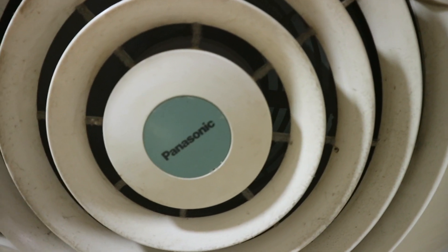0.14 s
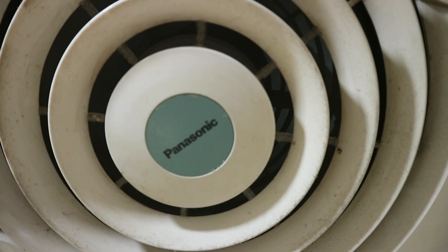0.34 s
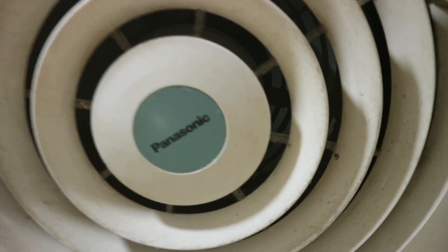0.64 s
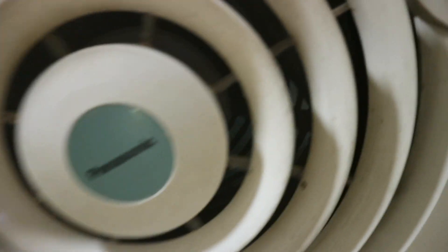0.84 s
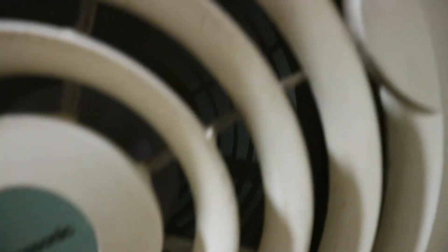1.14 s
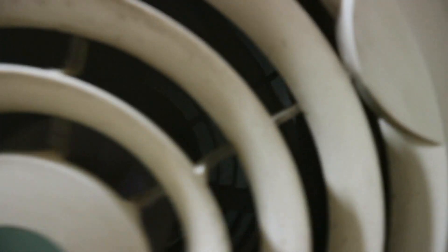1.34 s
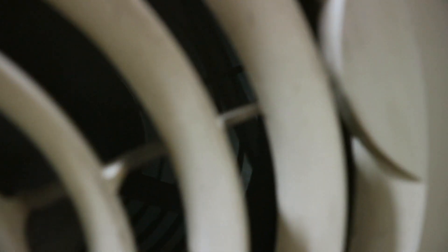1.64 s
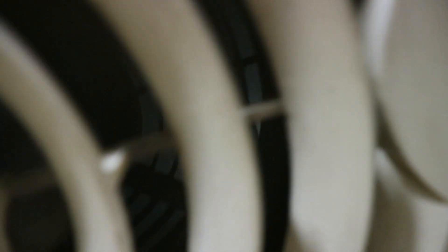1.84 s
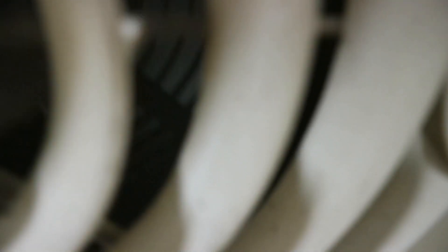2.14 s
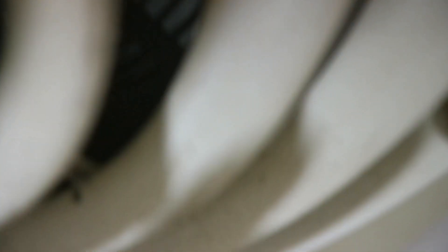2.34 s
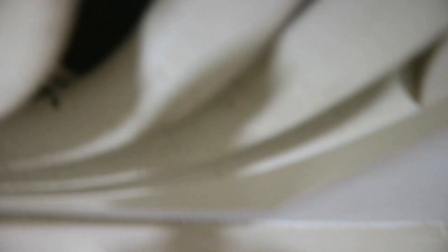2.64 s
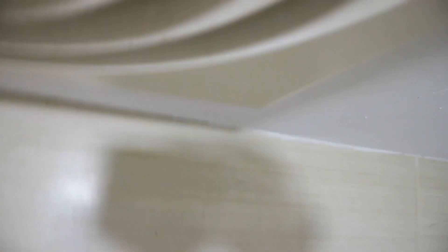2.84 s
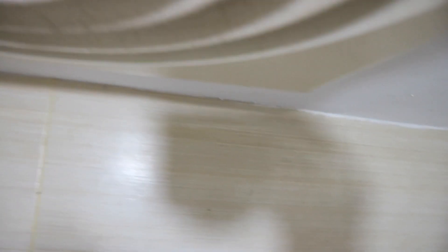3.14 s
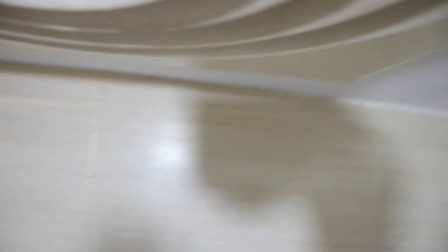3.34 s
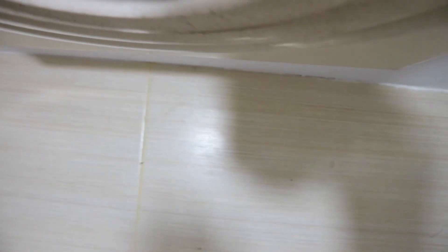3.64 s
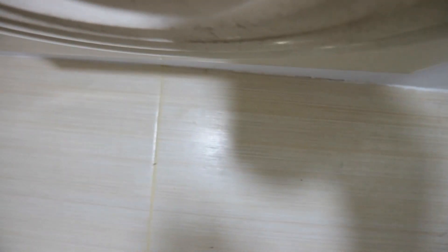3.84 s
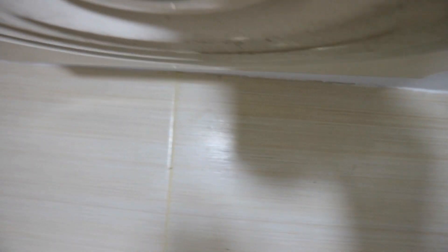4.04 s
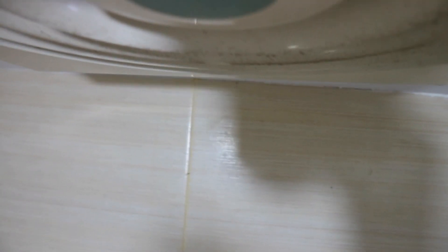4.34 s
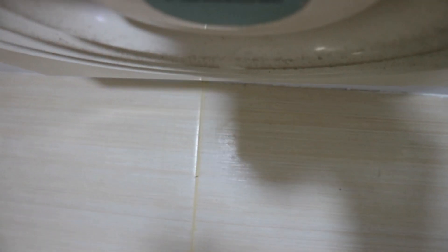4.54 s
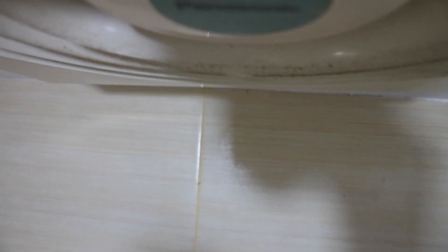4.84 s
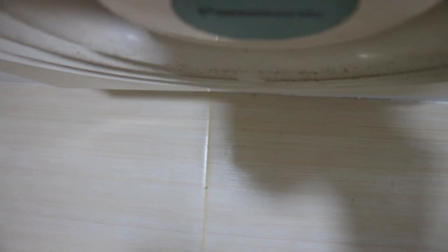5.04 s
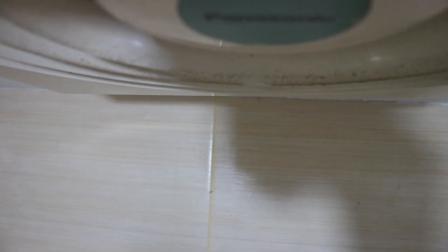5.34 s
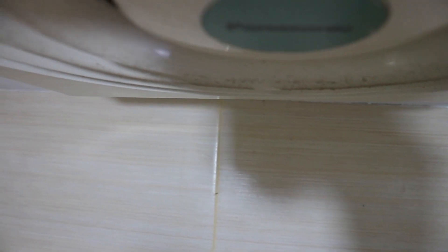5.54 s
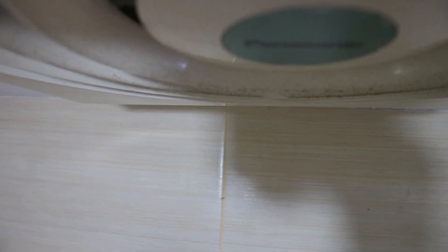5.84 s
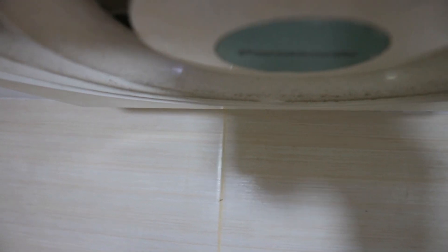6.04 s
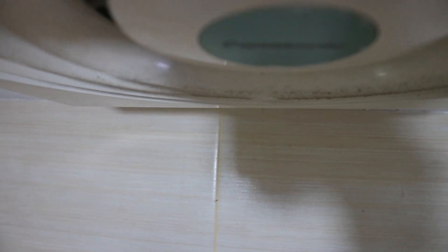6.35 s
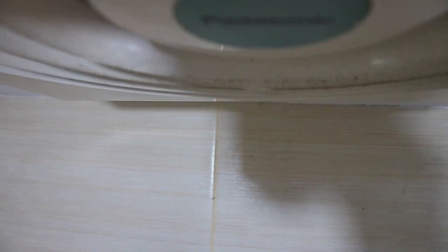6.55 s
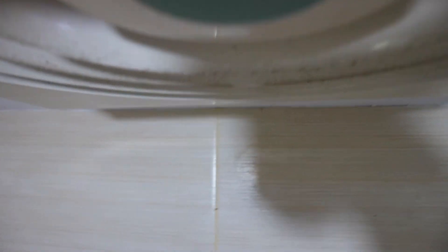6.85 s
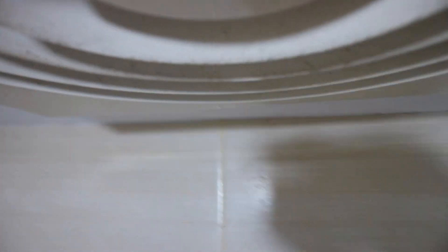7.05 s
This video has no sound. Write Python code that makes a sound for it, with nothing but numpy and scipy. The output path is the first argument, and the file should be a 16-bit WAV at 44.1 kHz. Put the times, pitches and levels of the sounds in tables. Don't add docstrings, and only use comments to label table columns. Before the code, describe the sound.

Close under a running bathroom exhaust fan, a deep mains hum and wavering duct drone lie beneath a soft hiss of air through louvres. A few small plastic handling clicks come early. Midway the handheld stereo microphone enters the draught, and rough low thumps swamp the hum, ease briefly, then return as low rumbling surges at the end.

```python
import sys
import numpy as np
from scipy import signal
from scipy.fft import rfft, irfft
from scipy.io import wavfile
from scipy.ndimage import uniform_filter1d

SR = 44100
rng = np.random.default_rng(int(sys.argv[2]) if len(sys.argv) > 2 else 0)


def to_wav(s):
    ch = np.atleast_2d(s).T
    pcm = np.round(np.clip(ch, -1, 1) * 32767)
    wavfile.write(sys.argv[1], SR, pcm.astype(np.int16))


def makeup_ratio(level_db):
    decades = np.asarray(level_db, float) / 20
    return 10 ** decades


N = 317520
T = np.arange(N) / SR
SIDES = np.array([[1], [-1]])

# t/s, peak level/dB, left minus right/dB, f/Hz, common over opposed part/dB
CASE_TICKS = [
    (.6, -27, 2, 2500, -3),
    (.738, -35, 4, 8000, 0),
    (.77, -30, 4, 3500, -3),
    (2.5, -32, 2, 3000, -3),
    (2.67, -33, 3, 4500, 1),
    (2.884, -27, -3, 3300, 0),
    (2.886, -32, -3, 5200, 1),
    (2.57, -34, 2, 5000, 1),
    (3.75, -41, 2, 6000, 0),
    (6.07, -38, 2, 6500, 0),
]
# t/s, left minus right/dB
CAMERA_TURN = [(0, .2), (2.5, .2), (4.5, -.8), (5.6, -.8), (6.2, 0), (7.2, .2)]
# t/s, strength/dB, level of the opposed part over the common part/dB
DRAUGHT_STRENGTH = [(0, -42, -13), (.75, -42.5, -5), (1.3, -42, -8.5), (2.5, -39.5, -1.5), (3.0, -35, -6),
                    (3.6, -25.5, -8.5), (3.9, -21.5, -2), (4.1, -26, -4.5), (4.5, -22, 0), (4.8, -24, 2),
                    (5.25, -22, -1.5), (5.45, -26.5, -3.5), (5.7, -28.5, -7.5), (5.9, -29, -15.5),
                    (6.35, -19, -12.5), (6.85, -19, -14), (7.05, -21, -5.5), (7.2, -27, -15)]
# f/Hz, level/dB
BUFFET_COLOUR = [(20, -48.5), (40, -18), (87, 2), (230, 10), (445, -2.5), (655, -13), (1170, -28),
                 (2100, -43.5), (4000, -77.5)]
# f/Hz, level/dB
SURGE_COLOUR = [(15, -24), (36, 2), (55, 2), (80, 1), (150, -2), (260, -6), (450, -12), (700, -21),
                (1200, -36), (4000, -75)]
# t/s, peak level/dB, left minus right/dB, f/Hz
BIG_THUMPS = [(3.697, -11, 4, 370), (3.726, -17.5, -7.5, 480), (3.876, -10, -4, 442),
              (3.933, -4.5, -4, 475), (4.048, -13, -4, 340), (4.34, -17, -4, 450), (4.486, -10, 1.5, 450),
              (4.531, -11.5, 1, 397), (4.578, -14, 0, 490), (4.616, -11, 3.5, 440), (4.689, -14, -5, 362),
              (4.729, -14, -2, 320), (4.759, -9, -1, 400), (4.856, -10.5, 1, 450), (4.886, -11, 1, 480),
              (4.997, -2.5, 2.5, 390), (5.045, -7, -3.5, 580), (5.113, -10, -2, 380), (5.185, -10, -4, 440),
              (5.242, -4, -3, 450), (5.264, -14, 4, 400), (5.315, -11, 4, 338), (5.362, -15, 3, 430),
              (5.464, -21, -8, 452), (5.62, -9, -11.5, 450), (5.652, -20, -10, 480), (6.566, -17, 3, 446),
              (6.885, -15, 8, 400), (6.995, -7, 7, 378)]
# t/s, drone level/dB
DRONE_LEVEL = [(0, -17.5), (.36, -24), (.55, -17.5), (.7, -19.5), (.82, -33), (1.15, -13.5), (1.65, -12.5),
               (2.05, -18), (2.25, -14.5), (3.25, -16), (3.43, -22), (3.9, -19.5), (4.3, -31), (4.75, -22),
               (5.3, -27.5), (5.75, -38), (6.5, -21.5), (7.2, -22.5)]
# multiple of the duct's pitch, level/dB
DRONE_OVERTONES = [(1, -0.5), (2, -15.5), (4, -23.5), (5, -27.5), (6, -24.5)]
# t/s, rush level/dB
NEARNESS = [(0, -31.5), (.3, -32), (.6, -32), (1.15, -31), (1.33, -34.5), (1.7, -33), (1.86, -33.5),
            (2.13, -29.5), (2.38, -33.5), (2.56, -31), (2.76, -34), (3.2, -33), (3.87, -35.5), (4.0, -37.5),
            (4.5, -36), (5.15, -41), (6.68, -31), (7.2, -34)]
# f/Hz, level per Hz/dB
AIR_COLOUR = [(25, -30), (45, -25.5), (85, -8.5), (130, -14), (220, -17.5), (400, -23.5), (880, -29),
              (1250, -31.5), (1600, -32), (1900, -34), (3200, -43.5), (6300, -60), (9000, -71.5),
              (15500, -86)]
# f/Hz, level/dB
AIR_SIDE = [(60, -31.5), (140, -34.5), (500, -18), (1000, -13.5), (1500, -14), (2600, -9.5), (5000, -2),
            (9000, 3.5), (13000, 6)]
# f/Hz, left minus right/dB
AIR_PAN = [(100, -1.5), (500, .5), (1100, 2.5), (3000, 3), (8000, 4.5), (13000, 0)]
# f/Hz, width/Hz, level/dB
HOUSING_RINGS = [(130.3, 6.6, 8.5), (164.7, 5, 4.5), (254, 7.6, 4), (288.4, 5.9, 6.5), (321.3, 8.3, 4),
                 (391, 8.5, 3.5), (420, 11, 0.5), (563, 10, 2.5), (1065, 60, 2), (1432, 110, 3.5),
                 (1670, 70, 2.5), (1850, 90, -2.5)]
# t/s, mains hum level/dB, blade tone level/dB, blade octave level/dB
MOTOR_TONES = [(0, -19, -29, -33), (.6, -17.5, -32, -32), (.95, -18, -36, -26), (1.4, -18, -38, -36),
               (2.3, -18, -37, -36), (2.7, -18, -30, -29), (3.3, -19.5, -20, -28), (3.9, -20, -19, -30),
               (4.2, -23, -21, -30.5), (4.5, -21, -20, -33), (4.8, -24, -23, -40), (5.1, -28, -25, -40),
               (5.7, -30, -28, -39), (6.0, -29, -27, -39), (6.3, -25, -28, -37), (6.6, -19, -27, -35),
               (6.9, -26, -29, -35), (7.2, -23, -25, -36)]
# t/s, f/Hz
BLADE_PITCH = [(0, 97.3), (2.6, 97.3), (3.0, 95.9), (4.9, 95.9), (5.7, 96.5), (6.2, 97.5), (7.2, 97.5)]

DUCT_HZ = 65.56


def curves(table):
    s, *columns = np.transpose(table)
    return [np.interp(T, s, c) for c in columns]


def at_hz(table, hz):
    f, v = np.transpose(table)
    return np.interp(np.log(hz + 1), np.log(f), v)


def walk(rate):
    k = int(SR / rate)
    steps = np.repeat(rng.standard_normal(N // k + 1), k)
    return 1.3 * uniform_filter1d(uniform_filter1d(steps, k), k)[:N]


def shape(x, gain):
    return irfft(rfft(x) * gain, x.shape[-1])


def unit(x):
    return x / np.sqrt(np.mean(x ** 2))


def bursts(events, cycles, spread, ring):
    size = int(.04 * SR)
    t = np.arange(size) / SR - .02
    f = np.fft.rfftfreq(size, 1 / SR)
    out = np.zeros((2, N + size))
    noises = rng.standard_normal((len(events), 2, size))
    for (s, db, pan_db, hz, common_db), puff in zip(events, noises):
        puff = puff + ring * np.sin(2 * np.pi * hz * t + 2 * puff[:, :1])
        swell = np.exp(-.5 * (t * hz / cycles) ** 2)
        colour = np.exp(-.5 * (np.log2((f + 1) / hz) / spread) ** 2)
        puff = shape(puff * swell, colour)
        common, opposed = puff / np.abs(puff).max(axis=1, keepdims=True)
        start = int(s * SR) - size // 2
        both = makeup_ratio(common_db) * common + SIDES * opposed
        out[:, start:start + size] += makeup_ratio(db + SIDES * pan_db / 2) * both
    return out[:, :N]


def case_ticks():
    return bursts(CASE_TICKS, cycles=2.5, spread=.55, ring=.6)


def gusts(level_db, colour, ragged_db, rate):
    eddies = rng.standard_normal(N) * makeup_ratio(ragged_db * walk(rate))
    gain = makeup_ratio(at_hz(colour, np.fft.rfftfreq(N, 1 / SR)))
    return makeup_ratio(level_db) * unit(shape(eddies, gain))


def thumps():
    per_s = 30
    over_db, scatter_db, pan_spread_db, pitch_hz = 5.5, 2, 3, 420
    jitter, size, side, pitch = rng.standard_normal((int(per_s * T[-1]), 4)).T
    s = np.clip((np.arange(len(size)) + .5 + .3 * jitter) / per_s, .03, T[-1] - .03)
    buffet_db = sum(curves(DRAUGHT_STRENGTH))[(s * SR).astype(int)]
    peak_db = buffet_db + over_db + scatter_db * size
    patter = np.transpose([s, peak_db, pan_spread_db * side, pitch_hz * 2 ** (.18 * pitch)])
    eddies = np.vstack([BIG_THUMPS, patter])
    common_db = -9 + 0.77 * np.abs(eddies[:, 2])
    return bursts(np.c_[eddies, common_db], cycles=0.48, spread=1.05, ring=0.96)


def draught():
    strength_db, opposed_db = curves(DRAUGHT_STRENGTH)
    opposed = makeup_ratio(-1.5) * SIDES * gusts(strength_db + opposed_db, BUFFET_COLOUR, ragged_db=4.2, rate=70)
    together = gusts(strength_db, SURGE_COLOUR, ragged_db=3.2, rate=80)
    return opposed + together + makeup_ratio(-1.5) * thumps()


def air():
    mean_rush_db, pulsing_db = -33.5, 1.8
    looks_away_s, turn_s = 2.2, 1.4
    rush_db = curves(NEARNESS)[0]
    nearer_db = rush_db - mean_rush_db
    away = np.clip((T - looks_away_s) / turn_s + .5, 0, 1)
    pulsing = pulsing_db * np.sin(2 * np.pi * DUCT_HZ * T)
    treble_db = 4.5 - 0.11 * nearer_db - 3.5 * away + pulsing
    bass_db = -3.5 + 0.1 * nearer_db + 3.5 * away
    f = np.fft.rfftfreq(N, 1 / SR)
    rings_db = sum(db / (1 + ((f - hz) / width) ** 2) for hz, width, db in HOUSING_RINGS)
    colour = makeup_ratio(at_hz(AIR_COLOUR, f) + rings_db)
    colour /= np.sqrt(2 * np.sum(colour[(f > 900) & (f < 2500)] ** 2) / N)
    rush = rfft(rng.standard_normal((2, N))) * colour
    out, swell, shared = 0, walk(8), walk(14)
    for hz in 25 * 2 ** np.arange(0, 9.6, .5):
        band = np.cos(np.pi / 2 * np.clip(2 * np.log2((f + 1) / hz), -1, 1)) ** 2
        mid, side = irfft(rush * band, N)
        shared = .8 * shared + .6 * walk(14)
        bright = np.clip(np.log2(hz / 2000) / 2.14, 0, 1.4)
        deep = np.clip(np.log2(900 / hz) / 2, 0, 1)
        db = rush_db + bright * treble_db + deep * bass_db
        db = db + (0.37 + 1.1 * bright) * swell + 0.64 * shared + 0.45 * walk(25)
        pan = makeup_ratio(SIDES * at_hz(AIR_PAN, hz) / 2)
        out = out + makeup_ratio(db) * (pan * mid + makeup_ratio(at_hz(AIR_SIDE, hz)) * SIDES * side)
    return out


def duct(wander=0.34, skirt_db=-8, throb_hz=6.2, skirt_width_hz=2.1):
    phase = 2 * np.pi * DUCT_HZ * T + wander * walk(7)
    tone = sum(makeup_ratio(db + 0.7 * walk(18)) * np.sin(k * phase) for k, db in DRONE_OVERTONES)
    f = np.fft.rfftfreq(N, 1 / SR)
    skirt_gain = 1 / (1 + ((np.abs(f - DUCT_HZ) - throb_hz) / skirt_width_hz) ** 2)
    skirt = unit(shape(rng.standard_normal(N), skirt_gain))
    return makeup_ratio(curves(DRONE_LEVEL)[0]) * (makeup_ratio(2.0) * tone + makeup_ratio(skirt_db) * skirt)


def motor():
    mains_hz, beat_null_s = 99.96, 3.66
    hum_db, blade_db, octave_db = curves(MOTOR_TONES)
    mains = 2 * np.pi * mains_hz * (T - beat_null_s)
    blade = 2 * np.pi * np.cumsum(curves(BLADE_PITCH)[0]) / SR
    blade -= blade[int(beat_null_s * SR)]
    hum = makeup_ratio(hum_db) * np.sin(mains)
    blade_tone = makeup_ratio(blade_db) * np.sin(blade)
    octave = makeup_ratio(octave_db + 0.61 * walk(5.8)) * np.sin(2 * blade + .5 * walk(6))
    third = makeup_ratio(-43 + 2.9 * walk(6.8)) * np.sin(3 * blade + 1.0 * walk(8))
    return np.sqrt(2) * (hum - blade_tone + octave + third)


def scene():
    tones = (motor() + duct()) * (1 + makeup_ratio(-43.5) * SIDES)
    fan = tones + air()
    return fan * makeup_ratio(SIDES * curves(CAMERA_TURN)[0] / 2) + draught() + case_ticks()


def top_cut(x):
    return signal.sosfilt(signal.butter(12, 15700, fs=SR, output="sos"), x)


def record(dry):
    closing = np.clip((T[-1] - T) / .004, 0, 1)
    mix = closing * np.tanh(.85 * dry) / .83
    return top_cut(mix)


dry = scene()
out = record(dry)
to_wav(out)
```